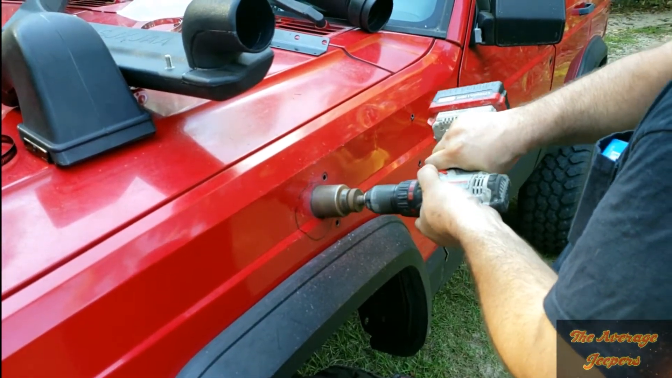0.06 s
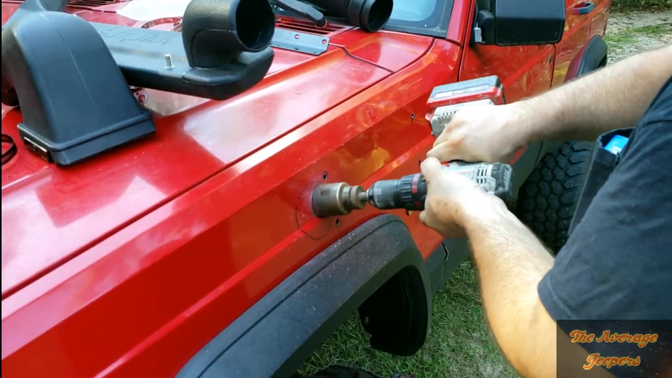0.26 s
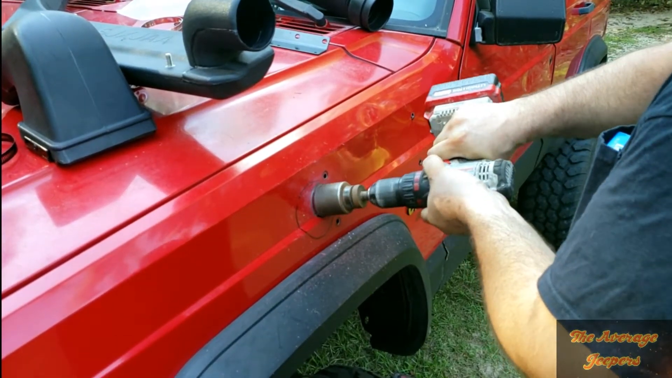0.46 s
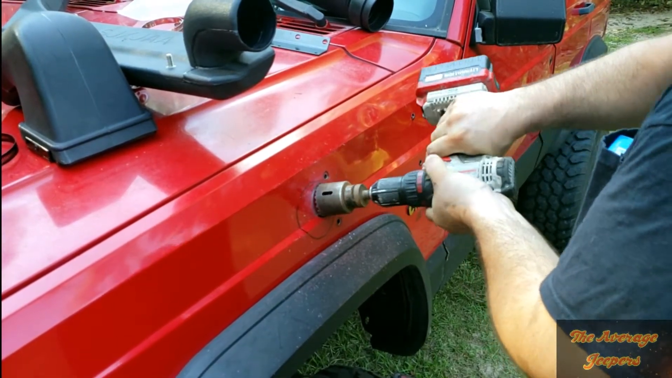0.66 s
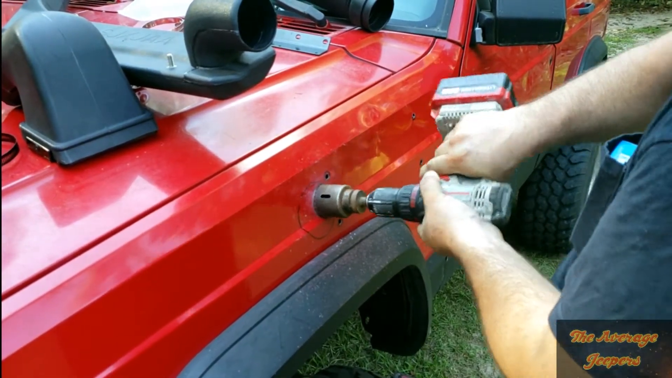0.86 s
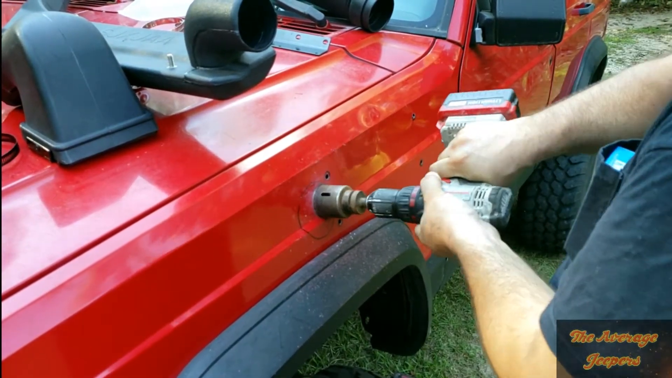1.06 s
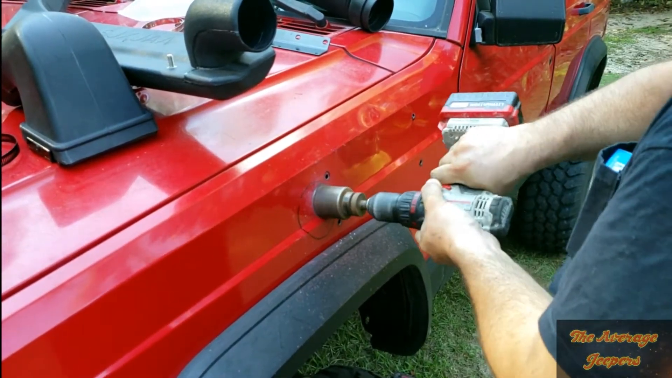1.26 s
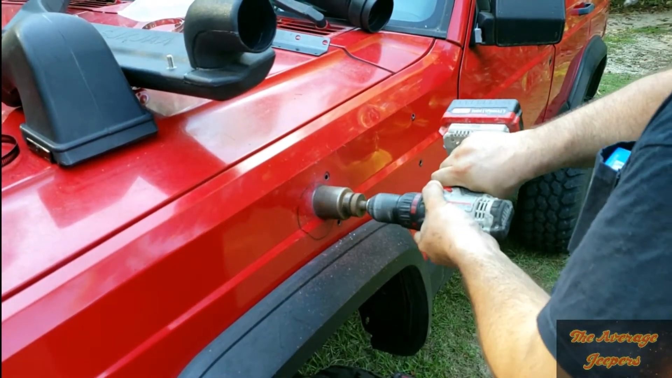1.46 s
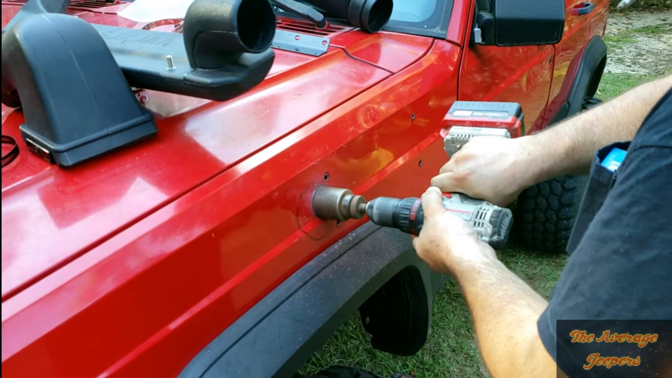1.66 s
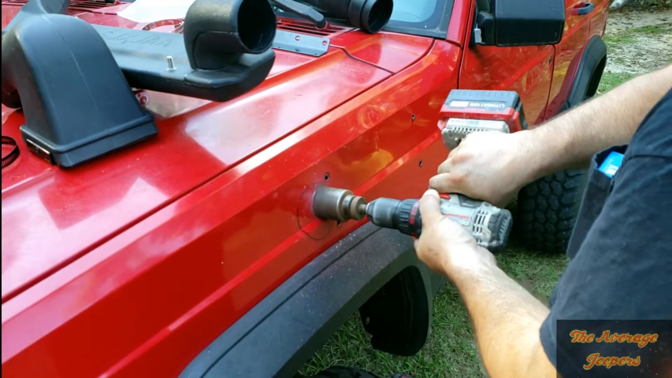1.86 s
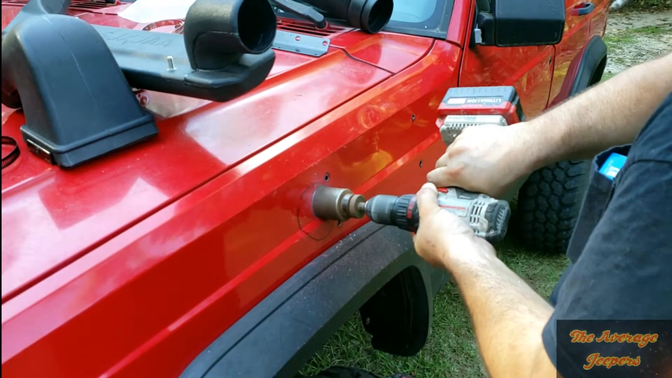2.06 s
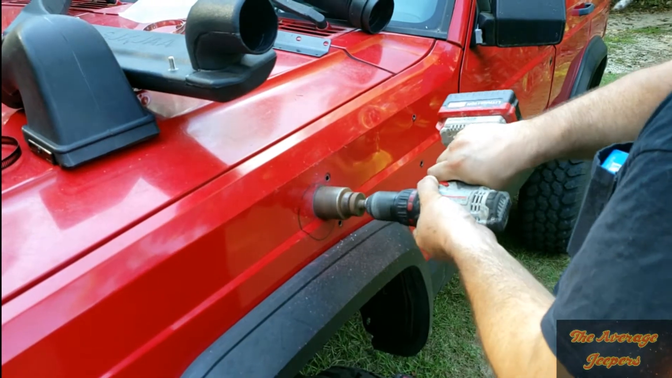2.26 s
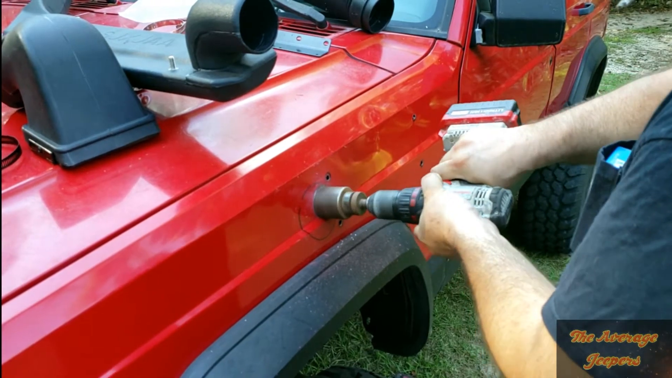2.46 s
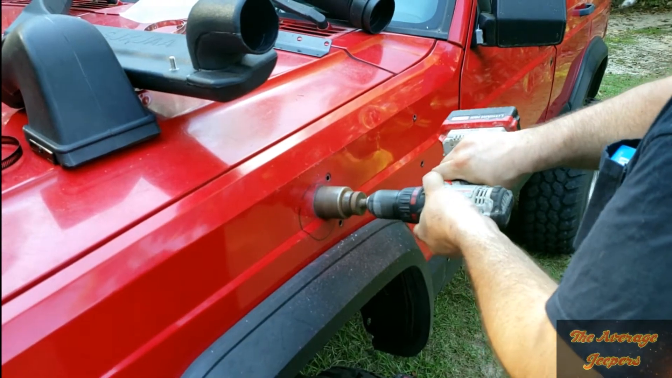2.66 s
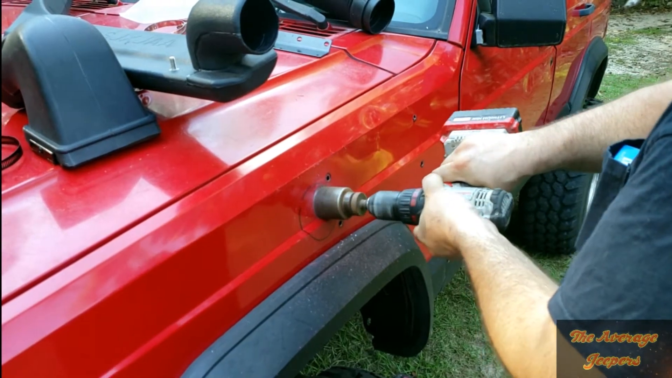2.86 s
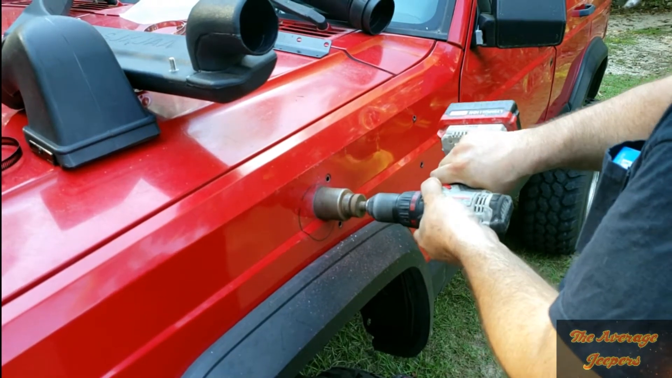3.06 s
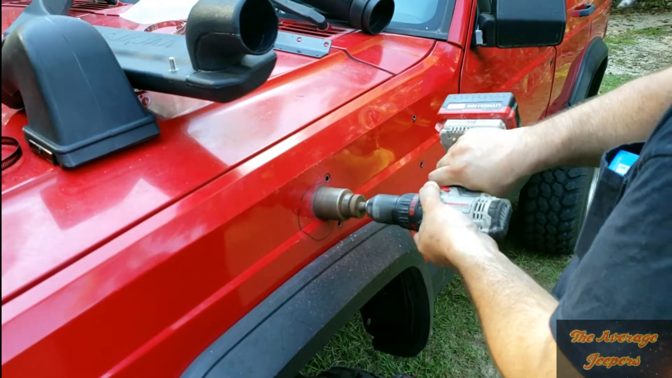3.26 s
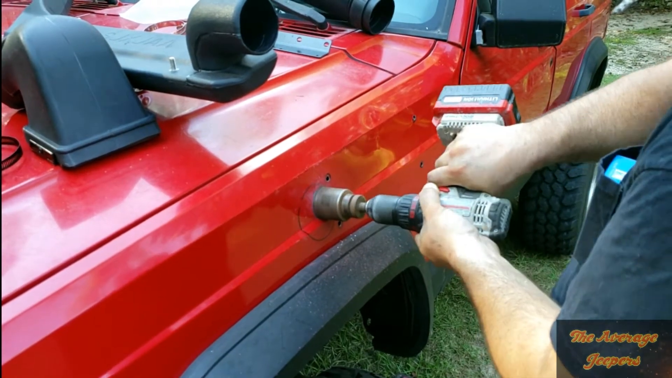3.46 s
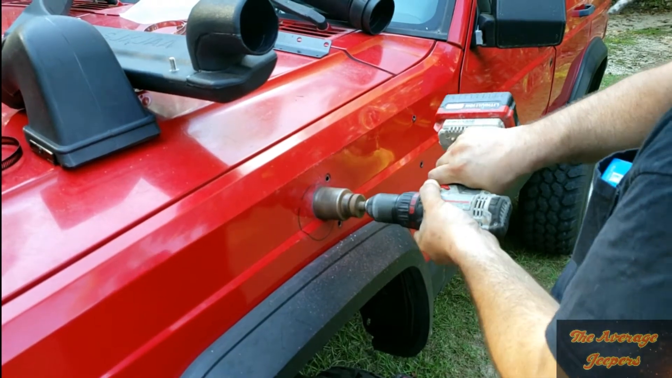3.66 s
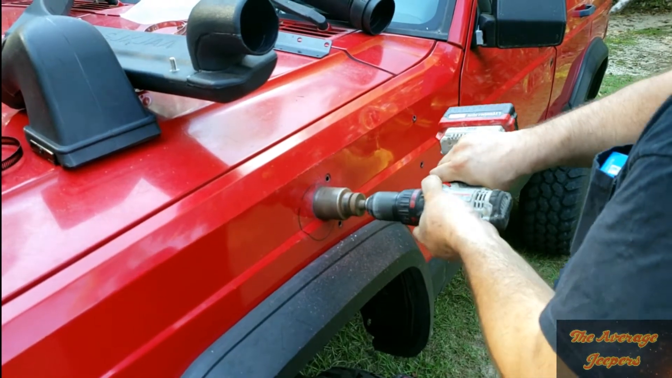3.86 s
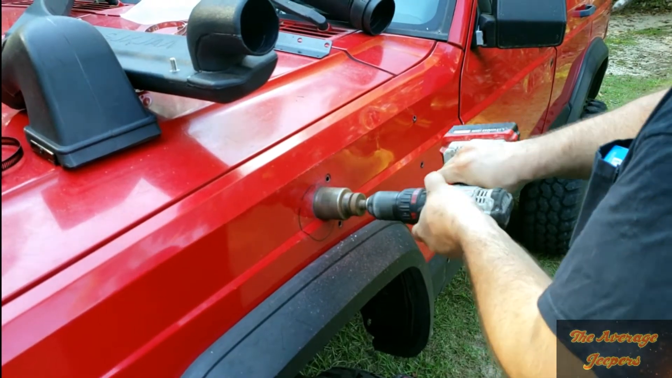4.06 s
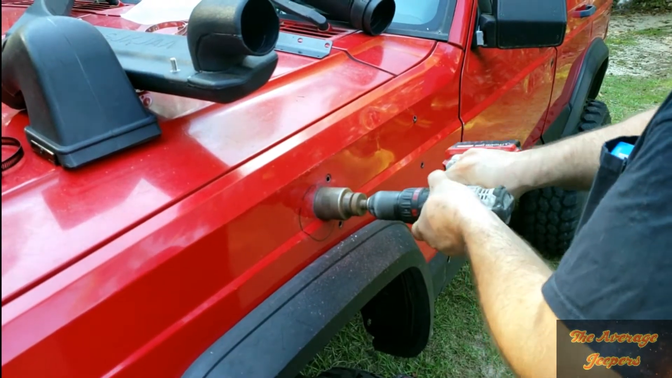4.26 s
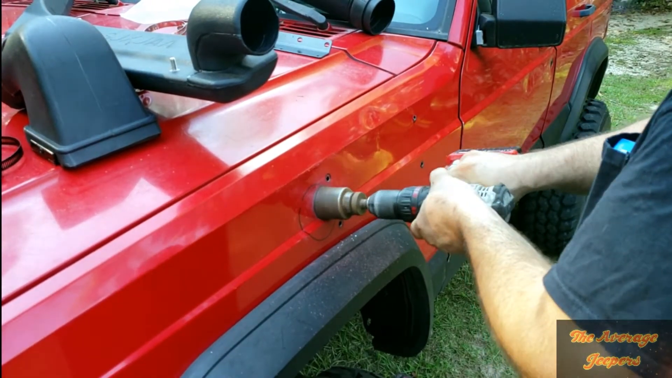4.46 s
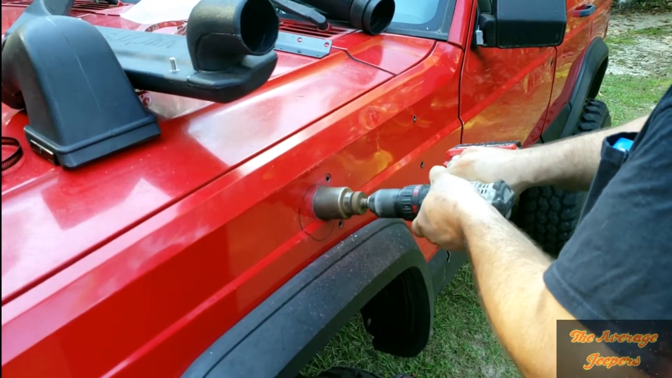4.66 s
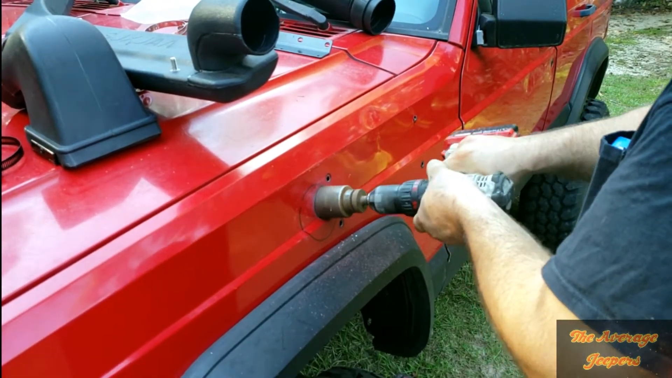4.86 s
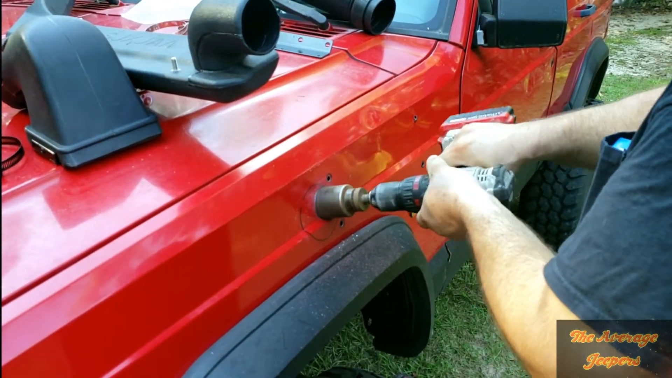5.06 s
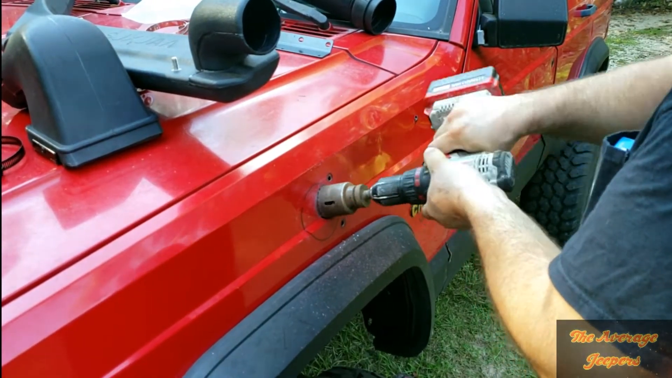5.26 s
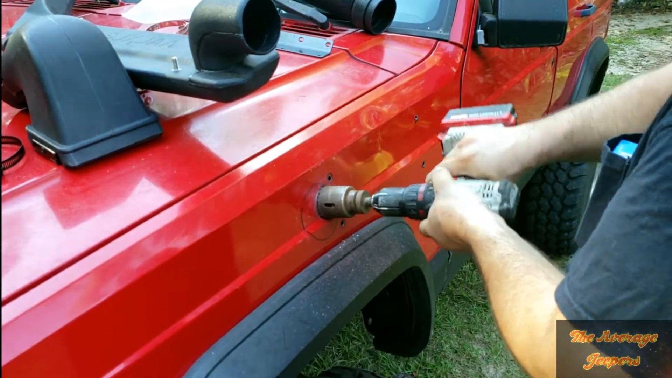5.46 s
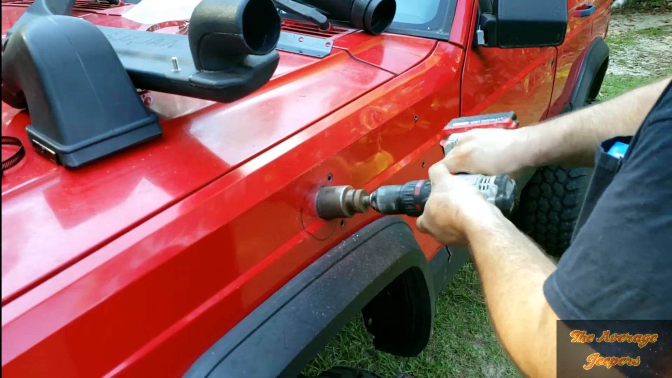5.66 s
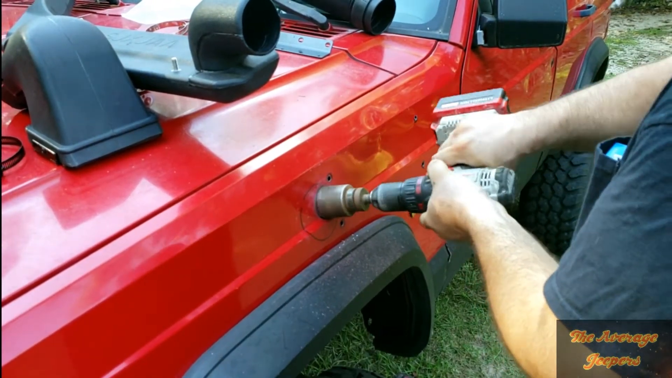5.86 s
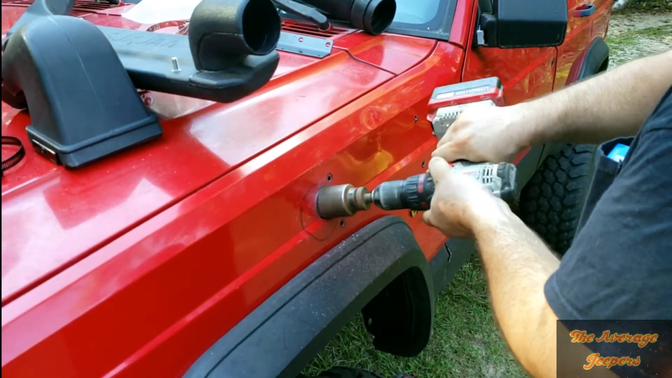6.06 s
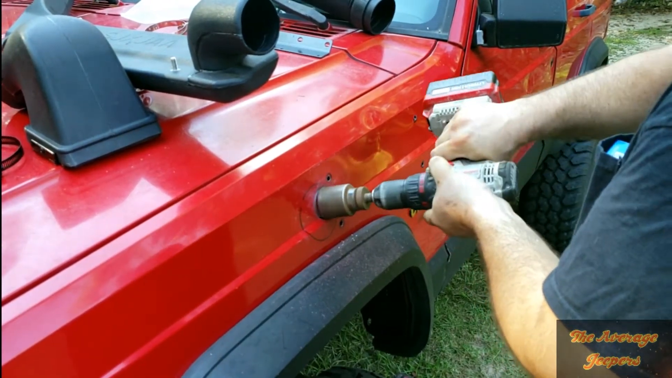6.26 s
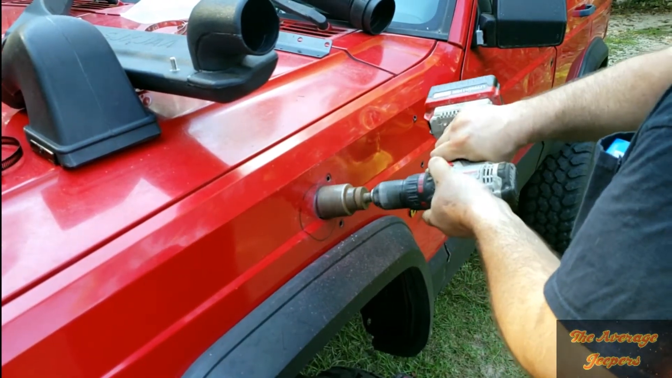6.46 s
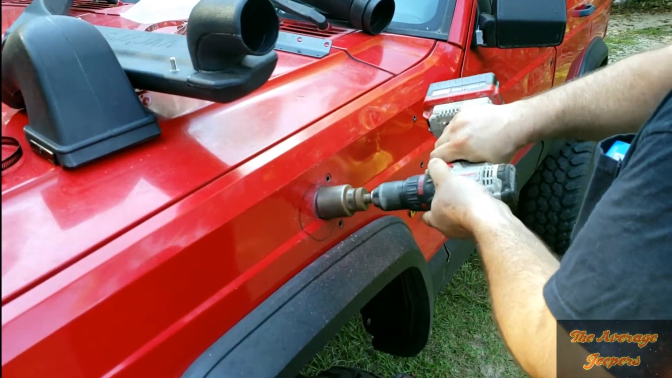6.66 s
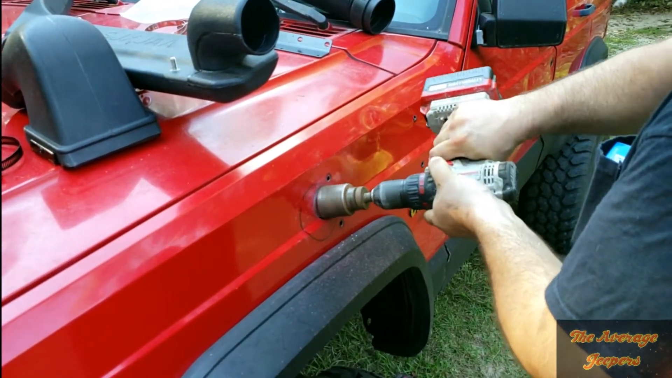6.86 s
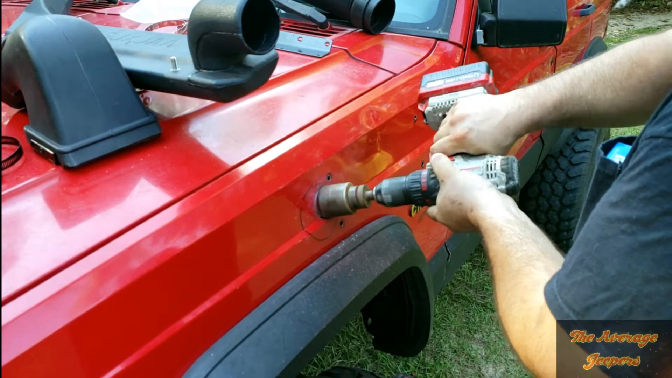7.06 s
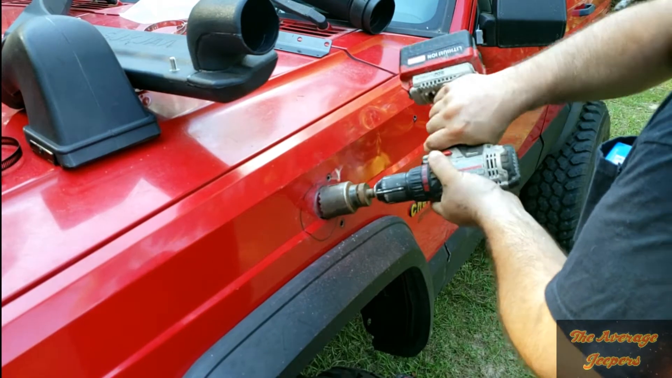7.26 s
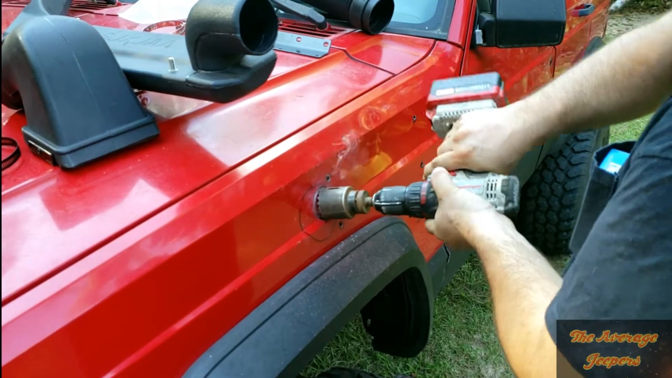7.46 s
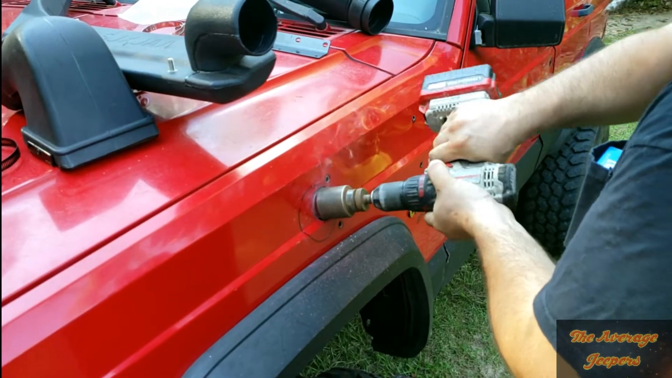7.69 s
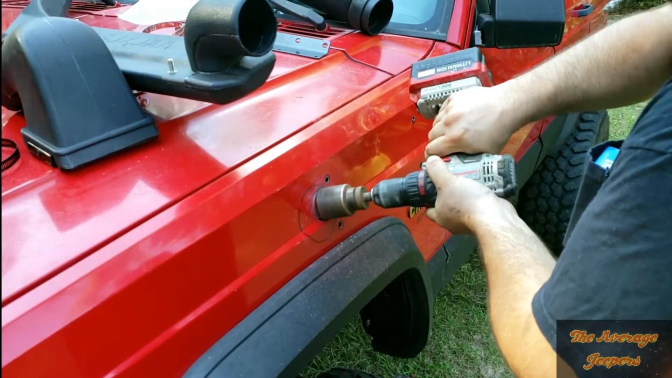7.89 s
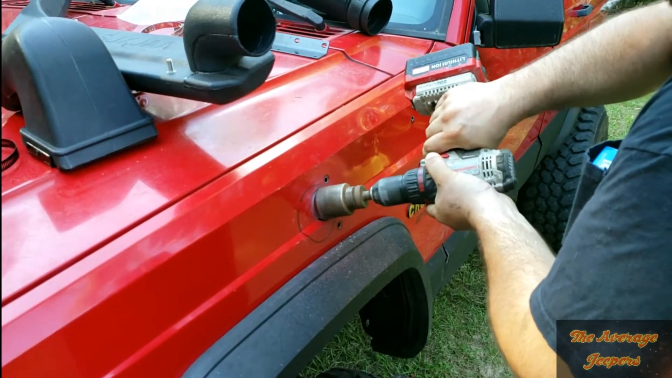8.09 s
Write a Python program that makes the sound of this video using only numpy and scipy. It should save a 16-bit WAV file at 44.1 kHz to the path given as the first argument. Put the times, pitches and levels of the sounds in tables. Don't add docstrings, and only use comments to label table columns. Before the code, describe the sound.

Close outdoor sound of a hole saw on a cordless drill cutting a car's steel panel. A brief cut is already running, stops with small dry squeaks, then a long loud cut booms and chatters with piercing squeals pulsing about sixteen times a second. After scuffs and knocks, two shorter, weaker runs follow with bright ticking scrapes.

```python
import sys
import numpy as np
from scipy import signal
from scipy.fft import rfft, irfft
from scipy.io import wavfile
from scipy.ndimage import uniform_filter1d

SR = 44100
rng = np.random.default_rng(int(sys.argv[2]) if len(sys.argv) > 2 else 0)


def wrap_up_sound(samples):
    columns = np.atleast_2d(samples).T
    tamed = np.clip(columns, -1, 1)
    steps = np.round(tamed * 32767).astype(np.int16)
    wavfile.write(sys.argv[1], SR, steps)


def ratio(d):
    e = np.asarray(d, float) / 20
    return 10 ** e


N = 358533
T = np.arange(N) / SR
HZ = np.maximum(np.arange(N // 2 + 1) * SR / N, 1)
E_FOLDS = np.log(1000)


def over_hz(table):
    f, value = np.transpose(table)
    return np.interp(np.log(HZ), np.log(f), value)


def over_time(table):
    return np.interp(T, *np.transpose(table))


def unit(x):
    return x / np.sqrt(np.mean(x ** 2))


def colour(x, table):
    return irfft(rfft(x) * ratio(over_hz(table)), N)


def walk(rate):
    k = int(SR / rate)
    held = np.repeat(rng.standard_normal(N // k + 1), k)
    return unit(uniform_filter1d(uniform_filter1d(held, k), k)[:N])


def ring(x, hz, t60):
    pole = np.exp(2j * np.pi * hz / SR - E_FOLDS / (t60 * SR))
    return signal.lfilter([1 - abs(pole)], [1, -pole], x)


def burst(start, length, rise, fall):
    out = np.zeros(N)
    part = slice(max(int((start - rise) * SR), 0), int((start + length + 12 * fall) * SR))
    t = T[part] - start
    attack = np.clip(t / rise + 1, 0, 1) ** 2
    out[part] = attack * np.exp(-np.clip(t - length, 0, None) / fall)
    return out


# f/Hz, left-right correlation
LIKENESS = [(60, .73), (150, .94), (350, .92), (640, .85), (1410, .45), (3100, .27), (5500, .27),
            (8000, -.2)]
# f/Hz, left minus right/dB
LEAN = [(200, .5), (380, 0), (900, 1.5), (2400, 2.5), (8000, 0.5), (15000, 0)]


def ports(make):
    like = np.clip(over_hz(LIKENESS), -.95, .95)
    mid = np.sqrt((1 + like) / 2) * rfft(make())
    side = np.sqrt((1 - like) / 2) * rfft(make())
    lean = ratio(over_hz(LEAN) / 2)
    return np.array([irfft((mid + side) * lean, N), irfft((mid - side) / lean, N)])


def teeth(spread_db):
    size_db = spread_db * np.minimum(rng.exponential(size=N // 8 + 1), 3)
    return rng.standard_normal(N) * ratio(np.repeat(size_db, 8)[:N])


def panel(spectrum, modes, cycles, spread_db, sweet=()):
    swell = [ratio(db + 4.0 * walk(30) + 1.5 * walk(4)) for _, db in modes]

    def strike():
        x = teeth(spread_db)
        out = x
        for gain, (hz, _) in zip(swell, modes):
            out = out + gain * ring(x, hz, cycles / hz).real * 2
        for hz, db, strongest, lasting in sweet:
            fed = ratio(db) * np.exp(-((T - strongest) / lasting) ** 2)
            out = out + fed * ring(x, hz, 38 / hz).real * 2
        return colour(out, spectrum)
    return unit(ports(strike))


# full speed t/s, released t/s, spin-up/s
RUNS = [
    (0.0, .574, .01),
    (1.163, 5.18, .016),
    (5.69, 7.122, .03),
    (7.712, 8.2, .026),
]
# t/s, bite of the teeth/dB, flex of the sheet/dB
PUSH_1 = [(0.0, -43, -4.5), (0.03, -39, -3), (0.312, -42.5, -1), (0.55, -35.5, 0), (0.56, -40, 6)]
PUSH_2 = [(1.17, -37.5, -3.5), (1.22, -30, -3), (1.55, -29.5, 0), (1.9, -36.5, 1), (2.3, -33, -6),
          (3.37, -37.5, -1.5), (3.68, -35.5, -4.5), (4.55, -38, -7), (5.16, -43.5, -4.5)]
PUSH_3 = [(5.7, -37.5, -7), (5.85, -37.5, 0), (6.02, -45.5, 0), (6.27, -41.5, 3.5), (6.45, -44.5, 3),
          (6.76, -43.5, 0), (6.96, -43.5, 0.5), (7.12, -42.5, 5.5)]
PUSH_4 = [(7.715, -36.5, 5), (7.739, -35, 3.5), (7.853, -41.5, 0.5), (8.13, -40.5, -5)]
LAYER_DB = [-3, -2, 1.92, -11.5]
FLEX_SHARE = [0.93, 0.49, 0.011, 0.0084]
BOUND_DB = [0.1, 0.57, 0.073, 8.8]
RING_OUT_T60_S = [0.22, 0.24, 0.11, 0.035]
RUB_DB = [-2, -3.5, 0, -23]
# t/s, length/s, level/dB
RUBS = [
    (0.788, 0.064, -63),
    (0.884, 0.066, -61),
    (1.068, 0.059, -68.5),
    (5.258, 0.0077, -69),
    (5.385, .012, -64.5),
    (5.447, 0.045, -55),
    (5.625, 0.045, -62.5),
    (7.195, 0.0067, -59),
    (7.401, 0.019, -49),
]


def effort(gate):
    s, bite_db, flex_db = np.concatenate([PUSH_1, PUSH_2, PUSH_3, PUSH_4]).T
    bite_db, flex_db = np.interp(T, s, bite_db), np.interp(T, s, flex_db)
    bound = uniform_filter1d(gate, int(.25 * SR))
    scuff = sum(ratio(db) * burst(a, length, 0.017, 0.17 / E_FOLDS) for a, length, db in RUBS)
    gains = []
    for db, share, bound_db, t60, rub_db in zip(LAYER_DB, FLEX_SHARE, BOUND_DB, RING_OUT_T60_S, RUB_DB):
        driven = sum(burst(a, b - a, rise, t60 / E_FOLDS) for a, b, rise in RUNS)
        push = ratio(bite_db + db + share * flex_db + bound_db * bound)
        gains.append(push * driven + ratio(rub_db) * scuff)
    return gains


# f/Hz, density/dB per Hz
DEEP = [(20, -16.5), (60, -9), (170, -6.5), (230, -2.5), (400, -1.5), (480, -2), (900, -55)]
UPPER = [(100, -76.5), (300, -43), (450, -4), (560, -0.5), (850, -4), (1000, -3.5), (1600, -53)]
CHATTER = [(150, -78), (600, -9.5), (950, -10), (2500, -2), (4600, -11.5), (5400, -10.5), (6200, -13.5),
           (8500, -25), (13000, -93.5)]
HISS = [(2500, -85.5), (5000, -9), (7000, -14.5), (8600, -6.5), (10500, 0), (13000, -2), (15800, -2.5),
        (16000, -99)]
# f/Hz, level over the broad response/dB
DEEP_MODES = [(255, -5), (305, 8.5), (370, 5)]
UPPER_MODES = [(605, 3), (725, 1.5), (790, 2.7)]
CHATTER_MODES = [(1085, 8.1), (1155, 7.5), (1275, 7.1), (1460, 1), (1575, 1.6), (1835, 9.7), (2210, 0.42),
                 (2545, 6.8), (3140, 3.2), (3420, 2.4), (3640, 0.63), (4185, 6), (4420, 6.9), (6145, 6)]
# f/Hz, level/dB, strongest t/s, lasting/s
SWEET = [(366, 15.5, 1.7, 0.8), (262, 5.5, 1.8, 0.29), (706, 0, 1.8, 0.48), (710, 4, 3.6, 0.37),
         (302, 9.5, 1.6, .15), (376, 12, 3.25, .15), (604, 13.5, 4.42, 0.24), (608, 7.5, 2.1, 0.17),
         (345, 8.5, 4.35, 0.53), (810, 4, 6.2, 0.34), (809, 14.5, 4.96, 0.39), (298, 4, 7.6, .15),
         (2453, 9, 3.65, 0.62)]
# f/Hz, level/dB, t60/s
WING = [(230.3, 0, 0.29), (290.5, -0.5, 0.37), (383.2, -7, 0.6), (617, -3.5, 0.29), (728, -2.5, 0.59),
        (753, -2, 0.31), (904, -15.5, 0.54), (1136, -10.5, 0.22)]
# t/s, level/dB
EASE = [(0, -3.5), (1.4, 2.5), (1.7, -3), (2.2, -2.5), (3, -3), (3.8, -1), (4.5, -1), (5.9, -2), (6.8, 0.5),
        (8.1, -0.5)]
# t/s, level/dB
THUMP = [(0, 0.12), (1.3, 0.11), (2, 1.5), (2.8, 0.1), (3.6, 1.8), (4.1, 3), (4.7, 3.5), (5.1, 2.5),
         (6, 0.095), (8.1, 0.1)]
# t/s, peak level/dB
CATCHES = [(1.1968, -22), (1.219, -18.5), (1.47, -18.5), (1.497, -12.5), (1.682, -17), (1.7511, -25),
           (1.8758, -25.5), (2.0349, -23), (2.0978, -24), (2.1492, -20.5), (2.206, -18), (2.379, -16),
           (2.45, -26), (2.513, -28.5), (2.7594, -23), (2.9299, -33), (3.1504, -15), (3.2542, -21.5),
           (3.3794, -37), (3.4662, -26.5), (3.6024, -29), (3.6243, -16), (3.9586, -29), (4.1646, -30)]


def cutting(gate):
    deep_gain, upper_gain, chatter_gain, hiss_gain = effort(gate)
    swing = uniform_filter1d(gate, int(0.0014 * SR)) - uniform_filter1d(gate, int(.12 * SR))
    load = over_time(EASE) * swing + .3 * walk(45)
    thump = over_time(THUMP) * np.interp(T + 0.024, T, swing)

    deep = panel(DEEP, DEEP_MODES, 16.2, 4.5, [m for m in SWEET if m[0] < 450])
    deep = deep * deep_gain * ratio(1.8 * load + 0.66 * thump + 0.73 * walk(35))
    upper = panel(UPPER, UPPER_MODES, 29, 1.9, [m for m in SWEET if 450 < m[0] < 1000])
    upper = upper * upper_gain * ratio(1.4 * load + 0.52 * thump + 0.49 * walk(35))
    boom = deep + upper
    wing = sum(ratio(db) * ring(boom, hz, t60).real for hz, db, t60 in WING)
    boom = boom + ratio(3) * wing

    chatter = panel(CHATTER, CHATTER_MODES, 33, 2.5, [m for m in SWEET if m[0] > 1000]) * chatter_gain
    catches = sum(ratio(db - 12.5) * burst(s, 0.00069, 0.0007, 0.0078) for s, db in CATCHES)
    rattle = ratio(1.7 * load + .7 * walk(60) + 1.3 * walk(220))
    chatter = chatter * (rattle + catches / chatter_gain.clip(1e-4))

    hiss = unit(ports(lambda: colour(teeth(spread_db=5.0), HISS)))
    arbor = sum(ratio(db) * ring(rng.standard_normal((2, N)), 7550, t60).real
                for db, t60 in [(9.2, 0.014), (5.3, 0.022)])
    hiss_load = ratio(6.0 + 4.6 * swing + 2.7 * load + 1.9 * walk(43))
    return boom + chatter + (hiss + arbor) * hiss_gain * hiss_load


# first bind t/s, last bind t/s, turns
SPELLS = [(.051, .133, 2), (1.219, 1.274, 2), (1.426, 1.479, 2), (1.538, 1.724, 4), (1.792, 1.941, 3),
          (2.01, 2.305, 6), (2.358, 2.643, 6), (2.708, 2.882, 4), (2.972, 3.207, 5), (3.276, 3.341, 2),
          (3.429, 3.614, 4), (3.712, 3.848, 3), (3.92, 4.752, 13), (4.831, 5.003, 3), (5.097, 5.097, 1),
          (5.706, 5.855, 3), (5.947, 6.023, 2), (6.545, 6.698, 3), (6.778, 6.867, 2), (6.965, 7.054, 2),
          (7.101, 7.101, 1), (7.809, 7.949, 3), (8.058, 8.128, 2)]
# t/s, squeal level/dB, share of a turn bound (0-1)
GRIP = [
    [(.051, -18.5, 0.24), (.133, -28.5, .27)],
    [(1.4, -32, .22), (1.52, -18.5, 0.25), (2.3, -24, 0.33), (2.43, -24, 0.73), (2.9, -25.5, 0.9),
     (3.16, -23, .95), (3.21, -23.5, 0.7), (3.28, -24, .62), (3.35, -24.5, 0.57), (3.6, -25, .85),
     (3.8, -20.5, 0.62), (4.75, -25.5, 0.41), (5.0, -30, 0.35), (5.1, -31, 0.6)],
    [(5.7, -28.5, 0.45), (5.86, -31, .34), (5.95, -40, 0.15), (6.03, -39, .2), (6.54, -34, 0.2),
     (6.78, -33.5, 0.3), (6.96, -49, 0.1), (7.1, -32, 0.8)],
    [(7.81, -33.5, 0.4), (7.95, -36.5, 0.9), (8.06, -26, 0.32)],
]
# t/s, pitch shift/Hz, rise within a bind/Hz per ms
SEAT = [(0, 30, 1), (1.5, 0, 2.5), (2.4, 0, 3), (2.9, -30, 0), (3.22, -60, 0), (3.35, 0, 5.5),
        (4.5, 0, 5.5), (4.9, 0, 2), (5.1, 60, 6), (5.7, 0, 1), (7.06, 0, 1), (7.1, -240, -1), (7.8, 0, 1)]


def binds():
    coasting_turn_s = .105
    s = np.concatenate([np.linspace(a, b, n) for a, b, n in SPELLS])
    turn = np.concatenate([[(b - a) / (n - 1) if n > 1 else coasting_turn_s] * n for a, b, n in SPELLS])
    at, db, share = np.concatenate(GRIP).T
    chance = rng.standard_normal((len(s), 2)).T
    share = np.where(turn == coasting_turn_s, .45, np.interp(s, at, share))
    length = np.clip(share, .05, .95) * np.minimum(np.diff(s, append=9), .095)
    level = np.interp(s, at, db) + .8 * chance[0]
    seat_s, shift_hz, glide_hz_per_ms = np.transpose(SEAT)
    hz = np.interp(s, seat_s, shift_hz) + 9700 + 9.5 * (1000 * turn - 60) + 25 * chance[1]
    glide = np.interp(s, seat_s, glide_hz_per_ms) * 1000 * length / 2
    return np.transpose([s, length, level, hz - glide, hz + glide])


def binding():
    gate, gain, points = np.zeros(N), np.zeros(N), []
    for s, length, db, hz0, hz1 in binds():
        part = slice(max(int((s - .01) * SR), 0), int((s + length + .08) * SR))
        t = T[part] - s
        shape = np.clip(t / .005 + .8, 0, 1) ** 2 * np.exp(-np.clip(t - length + .003, 0, None) / .005)
        gate[part] += shape
        gain[part] += shape * ratio(db - 2.5)
        reach = .3 * (hz1 - hz0)
        points += [(s, hz0 - reach, ratio(db / 2)), (s + length, hz1 + reach, ratio(db / 2))]
    s, hz, force = np.transpose(points)
    pitch = np.interp(T, s, hz) + 330 * np.interp(T, s, force) * walk(280)
    return np.minimum(gate, 1), gain, pitch


# f/Hz, level/dB
CUP = [(9460, 7), (9580, 1), (9710, 6), (9800, 0), (9890, 3), (10000, 0), (10260, 6)]
# t/s, peak level/dB
GRABS = [(1.4273, -19), (1.482, -10), (1.5395, -7), (1.599, -10.5), (1.6622, -9), (1.728, -10),
         (1.795, -7.5), (1.871, -6), (1.9344, -20.5), (2.0112, -14.5), (2.0773, -29), (2.1332, -38),
         (2.189, -26), (2.2514, -16), (2.3095, -12), (2.368, -11.5), (2.418, -14), (2.4749, -13),
         (2.5313, -15), (2.5876, -16.5), (2.65, -20), (2.7143, -27), (2.7732, -38), (3.0607, -11),
         (3.0915, -21), (3.1802, -14), (3.2788, -19), (3.3424, -13.5), (3.372, -15.5), (3.441, -13),
         (3.4952, -20), (3.513, -15), (3.5589, -16), (3.619, -16.5), (3.693, -17.5), (3.744, -13),
         (3.783, -12), (3.8513, -11.5), (3.9286, -15.5), (3.9899, -33), (4.0658, -22), (4.0855, -25),
         (4.1336, -26.5), (4.1546, -17), (4.2025, -25.5), (4.2218, -18), (4.2663, -23.5), (4.3446, -19),
         (4.401, -22.5), (4.4793, -20), (4.541, -17), (4.6125, -18), (4.6819, -21), (4.7552, -18),
         (4.832, -20), (4.92, -20), (5.0066, -19), (5.1159, -17), (5.137, -16), (7.996, -25)]


def squeal(gain, hz):
    slip = np.exp(2j * np.pi * np.cumsum(hz) / SR)
    modes = slip + sum(ratio(db) * ring(slip, f, .03) for f, db in CUP)
    turned = np.exp(1j * (1.9 + .1 * walk(12) + .4 * walk(160))) * modes
    tone = np.array([modes.real, turned.real])
    tone = tone / np.sqrt(uniform_filter1d(np.mean(tone ** 2, axis=0), int(.008 * SR)))

    scrape_shape = [(8900, -61.5), (9400, 0.0), (9800, 3.0), (10600, -10.5), (11200, -14), (12500, -50)]
    scrape = unit(colour(rng.standard_normal((2, N)), scrape_shape))
    grabs = sum(ratio(db - 6.5) * burst(s + 0.0024, 0.0039, 0.0024, .006) for s, db in GRABS)
    flutter = ratio(3.0 * walk(190))
    tone = np.maximum(gain * flutter, grabs) * (tone + ratio(-8.0) * scrape) + ratio(-16) * grabs * scrape

    lag = T[:SR // 2]
    tail = rng.standard_normal((2, len(lag))) * np.exp(-E_FOLDS * lag / 0.41)
    return tone + ratio(-55.0) * signal.fftconvolve(tone, tail, axes=1)[:, :N]


# t/s, peak level/dB, centre f/Hz, left minus right/dB
CHIPS = [(1.221, -20, 10200, -4), (4.449, -23, 12000, 1.5), (5.1153, -32, 11550, 6.5),
         (5.14, -45, 10300, 0.5), (5.18, -32, 10250, -2), (5.453, -38, 10200, 0), (5.97, -27, 13060, 4),
         (6.0531, -31, 14400, 5), (6.142, -29.5, 13440, 12), (6.326, -20, 13200, 8),
         (6.4037, -14.5, 13700, 5), (6.4925, -20, 11300, 5), (6.572, -17, 14100, 11),
         (6.651, -17.5, 12100, 1), (6.727, -25.5, 13700, 13), (6.813, -19.5, 13700, 7),
         (6.9019, -17, 12100, 7.5), (7.2235, -55, 12000, -6), (7.42, -50, 15500, 0),
         (7.758, -18, 14400, 6.5), (7.841, -30, 13500, 4), (7.9039, -32, 13500, 8)]


def chips():
    out = 0
    for s, db, hz, pan_db in CHIPS:
        near = hz * np.array([.65, .85, 1, 1.15, 1.5])
        peak = zip(near, [-18.0, -17.5, -4, -12, -18.5])
        shape = [(100, -40), (300, -27), (1500, -31), (5000, -21), *peak]
        scrape = unit(colour(rng.standard_normal((2, N)), shape)) * burst(s + .003, .002, .009, .0025)
        out = out + scrape * ratio(db - 6.0 + np.array([[pan_db], [-pan_db]]) / 2)
    return out


# t/s, length/s, level/dB, f/Hz, overtones/dB
SLIPS = [(0.824, 0.02, -28.5, 1964, -21), (0.841, 0.016, -35.5, 1930, -11), (0.868, 0.008, -34, 1892, -23),
         (0.887, 0.004, -36, 1974, -33), (0.899, .005, -39, 1908, -27), (0.92, 0.003, -34.5, 1912, -37),
         (0.932, .004, -46, 1880, -30), (0.946, 0.0265, -60, 1914, -23), (5.455, 0.015, -33, 2020, -6),
         (5.478, .016, -48, 2070, -12), (5.504, .022, -59, 2010, -16)]
# t/s, length/s, level/dB, f/Hz
CREAKS = [
    (0.771, 0.015, -67, 3720),
    (5.352, 0.023, -67.5, 3680),
    (7.328, 0.02, -74, 3700),
]


def squeaks():
    s, length, _, hz, _ = np.transpose(SLIPS)
    pitch = np.interp(T, s + length / 2, hz) * (1 + 0.0152 * walk(500))
    phase = 2 * np.pi * np.cumsum(pitch) / SR
    upper = sum(ratio(-5.2 * k + 4.5 * walk(300)) * np.cos((k + 2) * phase + k) for k in range(6))
    rises = np.where(np.diff(s, prepend=0) > .2, 0.021, .004)
    gates = [ratio(db) * burst(a, d, rise, 0.0041) for (a, d, db, _, _), rise in zip(SLIPS, rises)]
    first = sum(gates) * ratio(0.88 * walk(130))
    second = sum(g * ratio(row[4]) for g, row in zip(gates, SLIPS)) * ratio(2.0 * walk(130))
    smear = unit(colour(rng.standard_normal(N), [(1300, -31.0), (1850, 6.0), (2200, -34.0)]))
    out = first * (np.cos(phase) + ratio(-15) * smear) + second * upper

    for s, length, db, hz in CREAKS:
        phase = 2 * np.pi * np.cumsum(hz + 40 * walk(280)) / SR
        pair = np.cos(phase) + 0.36 * np.cos(2 * phase)
        out = out + ratio(db) * burst(s, length, .003, 0.0029) * pair
    return np.array([out * ratio(1.1), np.roll(out, 1) * ratio(-4.5)])


# t/s, peak level/dB, t60/s, brightness/dB
KNOCKS = [(1.106, -47, 0.28, -17), (1.157, -32, .08, 7.5), (5.598, -49.5, 0.11, -9),
          (5.652, -47, 0.17, 5.5), (5.669, -46, 0.15, 11), (6.405, -30, 0.065, -4), (6.555, -30, 0.072, -8),
          (6.901, -24.5, 0.049, 0), (7.064, -37, 0.091, -8), (7.996, -30.5, 0.074, -6),
          (7.354, -60, 0.14, 8), (7.394, -42, 0.15, 16), (7.507, -54, 0.16, 1), (7.569, -65, 0.12, 3)]


def knocks():
    low = panel(UPPER, UPPER_MODES, 45, spread_db=2.5) + panel(DEEP, DEEP_MODES, 22, spread_db=-6.0)
    rattle_shape = [(700, -20), (1500, 0.0), (5000, -9.0), (16000, -13.0)]
    high = panel(rattle_shape, [(2540, 4.3), (4090, 14), (7800, 4.9)], 70, spread_db=4.5)
    out = 0
    for s, db, t60, top_db in KNOCKS:
        boom = low * burst(s, 0.0016, 0.0014, t60 / E_FOLDS)
        rattle = ratio(top_db) * high * burst(s, 0.0018, 0.00055, 0.33 * t60 / E_FOLDS)
        out = out + ratio(db - 8.5) * (boom + rattle)
    return out


# f/Hz, density/dB per Hz
AIR = [(18, -34), (30, -2), (328, -7), (473, -11.5), (740, -7.5), (1350, -14.5), (5900, -28.5), (8080, -25),
       (16000, -27.5)]
# t/s, level/dB
BREEZE = [
    (0, 3),
    (1.0, 1),
    (5.3, -1),
    (7.5, -2),
    (7.65, -8.5),
    (8.1, -6),
]


def outdoor_air():
    noise = unit(ports(lambda: colour(rng.standard_normal(N), AIR)))
    return ratio(-69 + over_time(BREEZE)) * noise


def scene():
    gate, gain, hz = binding()
    return cutting(gate) + squeal(gain, hz) + chips() + squeaks() + knocks() + outdoor_air()


def roll_off(x):
    return signal.sosfilt(signal.butter(12, 16830, fs=SR, output="sos"), x)


def record(dry):
    low_pass = signal.ellip(10, .2, 50, 15900, fs=SR, output="sos")
    mix = signal.sosfilt(low_pass, dry)
    return roll_off(mix)


dry = scene()
out = record(dry)
wrap_up_sound(out)
```